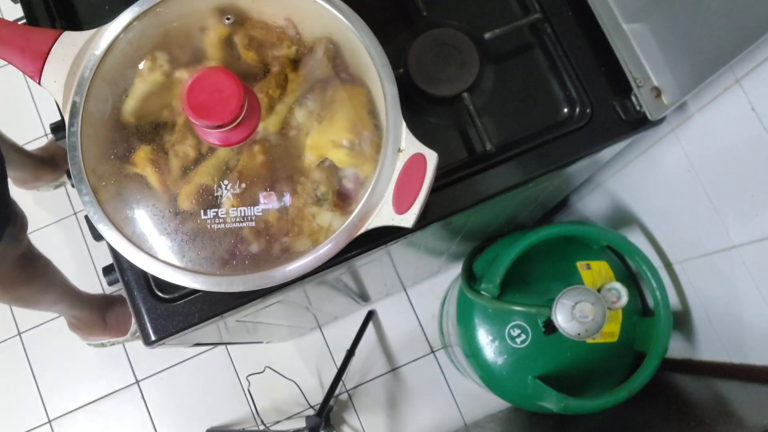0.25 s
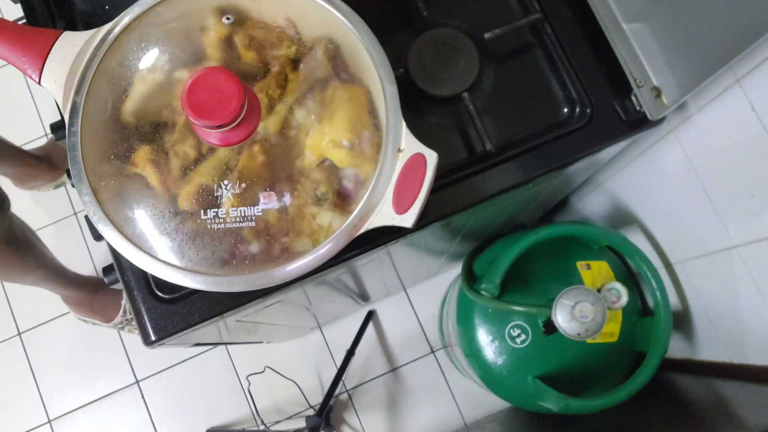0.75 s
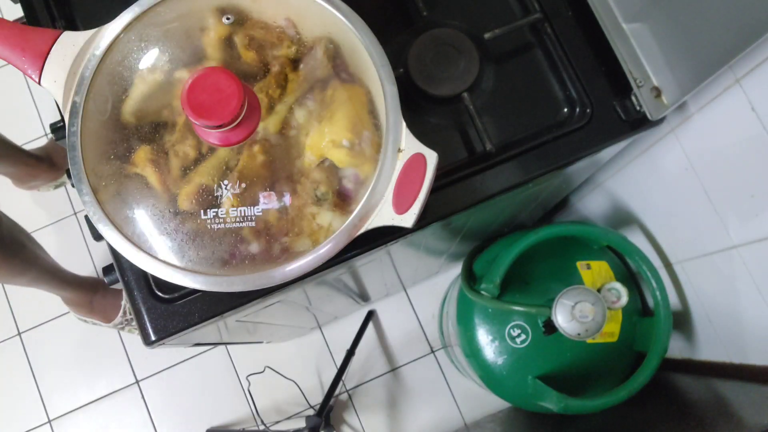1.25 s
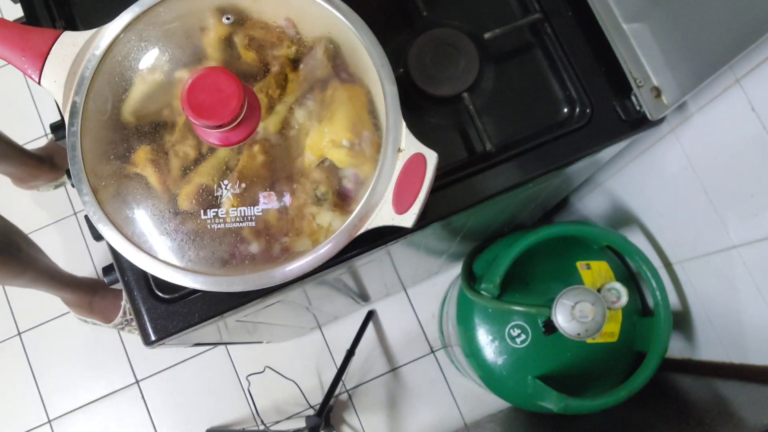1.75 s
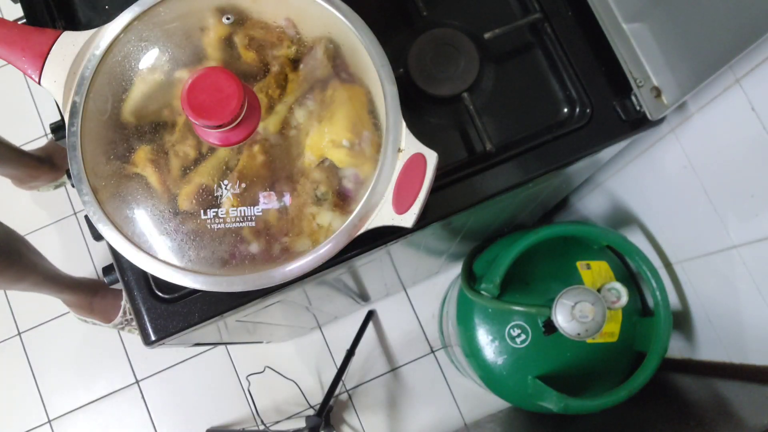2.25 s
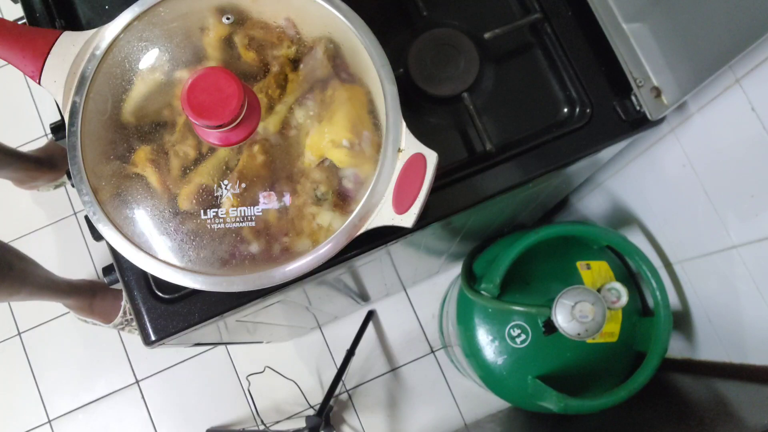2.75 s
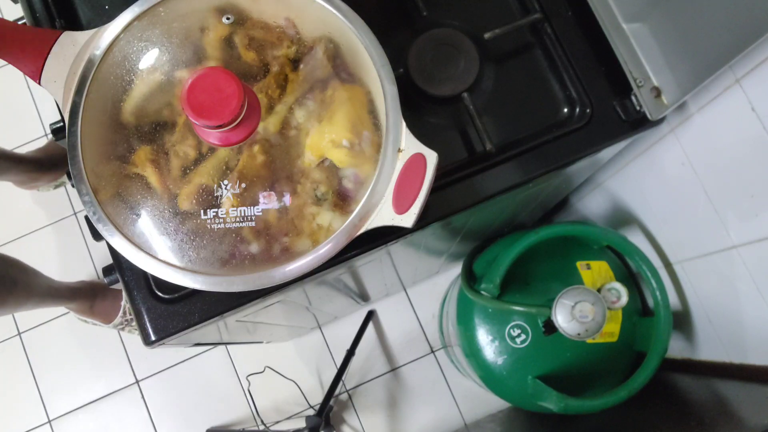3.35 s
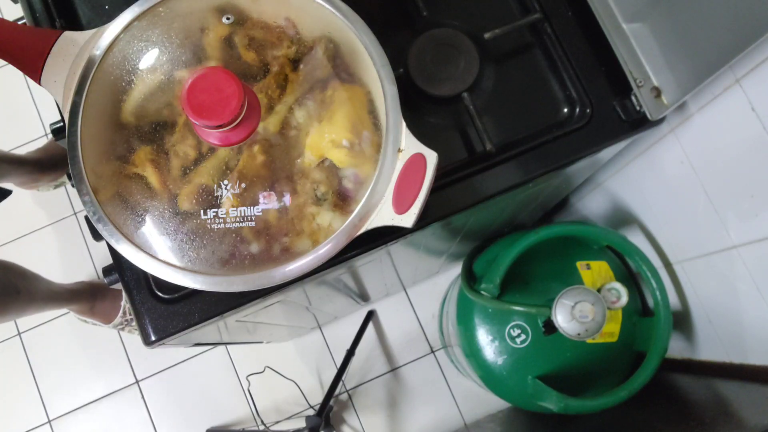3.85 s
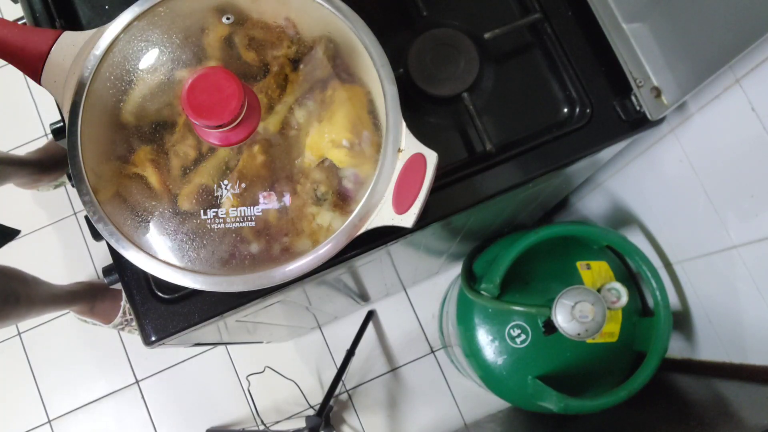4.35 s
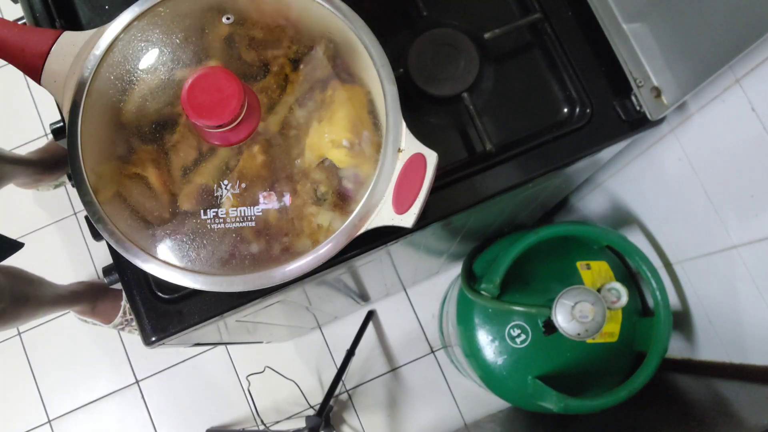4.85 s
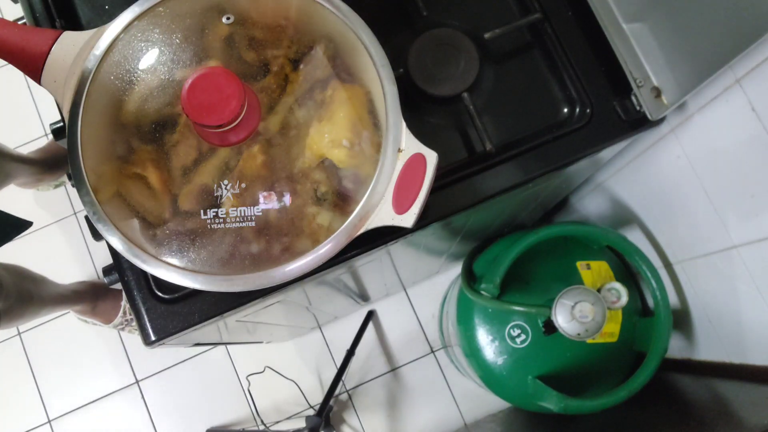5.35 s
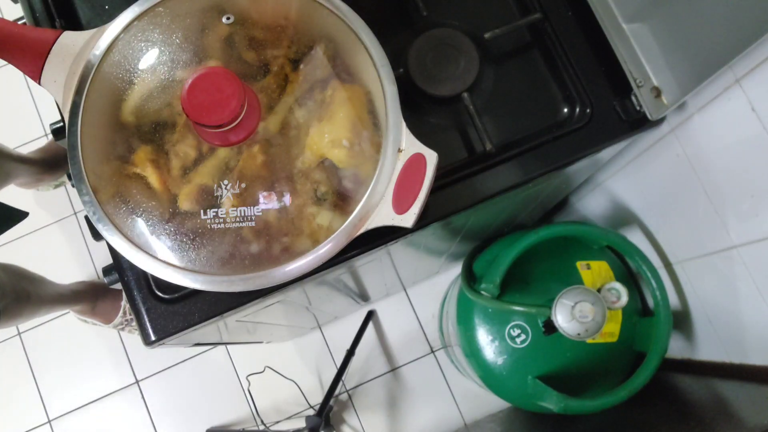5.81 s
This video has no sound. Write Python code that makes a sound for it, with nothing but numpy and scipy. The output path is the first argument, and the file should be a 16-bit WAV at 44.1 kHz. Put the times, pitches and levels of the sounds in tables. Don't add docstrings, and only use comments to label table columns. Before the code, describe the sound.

Close, gentle sizzling and bubbling in a covered pan over faint low machine hum, with one short clunk and rattle of the stove early on.

```python
import sys
import numpy as np
from scipy import signal
from scipy.fft import rfft, irfft, next_fast_len
from scipy.io import wavfile
from scipy.ndimage import uniform_filter1d, map_coordinates

SR = 44100
rng = np.random.default_rng(int(sys.argv[2]) if len(sys.argv) > 2 else 0)


def how_loud(loudness_db):
    steps = np.asarray(loudness_db, float) / 20
    return 10 ** steps


def master(y):
    cut = np.clip(np.atleast_2d(y).T, -1, 1)
    pcm = np.round(cut * 32767)
    wavfile.write(sys.argv[1], SR, pcm.astype(np.int16))


N = 267995


def unit(x):
    return x / np.sqrt(np.mean(x ** 2) + 1e-20)


def along(points, hz):
    f, v = np.transpose(points)
    return np.interp(np.log(hz + 1), np.log(f + 1), v)


def wobble(rate):
    return map_coordinates(rng.standard_normal(N // 100), [np.arange(N) * rate / SR])


def filtered(x, response):
    m = next_fast_len(N + SR // 2)
    return irfft(rfft(x, m) * response(np.fft.rfftfreq(m, 1 / SR)), m)[..., :N]


def coloured(x, colour):
    return filtered(x, lambda hz: how_loud(along(colour, hz)))


def peak(hz, centre_hz, width_hz):
    return 1j * hz * width_hz / (centre_hz ** 2 - hz ** 2 + 1j * hz * width_hz)


def resonant(x, modes):
    def response(hz):
        return sum((-1) ** k * how_loud(db) * peak(hz, f, width) for k, (f, width, db) in enumerate(modes))
    return filtered(x, response)


# f/Hz [Hz], correlation [0-1]
SIDE_LIKENESS = [(60, .988), (200, .94), (330, .74), (1000, .7), (1350, .5), (2500, .48), (3500, .45),
                 (4300, .7), (5000, .5), (7500, .4), (10000, .2), (15000, .1)]
# f/Hz [Hz], lead of the right side [rad]
RIGHT_LEAD = [(700, 0), (1150, -.7), (1600, 2), (1900, .3), (2600, .4), (2900, -1.8), (3330, .8),
              (3560, 2.6), (3950, -1.4), (4700, 3.1), (5300, 4.9), (6000, 9), (7500, 13.6), (9000, 18)]


def spread(pair):
    def weights(hz):
        turn = np.arccos(np.clip(along(SIDE_LIKENESS, hz), -1, 1)) / 2
        return np.array([np.cos(turn), np.sin(turn)])
    mid, side = filtered(pair, weights)
    right = filtered(mid - side, lambda hz: np.exp(1j * along(RIGHT_LEAD, hz)))
    return np.array([mid + side, right])


# f/Hz [Hz], relative t60/s [s]
TILE_DECAY = [(200, 1), (2000, 0.35), (8000, 0.95), (15000, 0.065)]


def echo(x, t60_scale):
    hz, t, z = signal.stft(rng.standard_normal((2, SR // 2)), SR, nperseg=256)
    t60 = t60_scale * along(TILE_DECAY, hz)[:, None]
    tail = signal.istft(z * how_loud(-60 * t / t60), SR, nperseg=256)[1]
    return signal.fftconvolve(np.atleast_2d(x), tail / np.linalg.norm(tail[0]), axes=1)[:, :N]


# f/Hz [Hz], width/Hz [Hz], level/dB [dB]
ROOM_MODES = [(30.3, 3.2, -14), (44.4, 5.7, -9.5), (63, 16.4, -10), (87.5, 8.4, -7.5), (113, 41, -15),
              (151.3, 28.7, -11), (164.4, 26.7, -14), (231, 32, -22), (253.5, 38, -25.5), (356, 89, -29)]
# f/Hz [Hz], level/dB [dB rms]
MOTOR_TONES = [(44, -64.5), (60, -53.5), (86, -64), (145, -74), (253, -78.5), (299, -86), (337, -86.5),
               (392.5, -79.5), (422, -85.5), (480.5, -86.5), (523, -81.5), (555, -85)]


def kitchen():
    t = np.arange(N) / SR
    air = unit(resonant(spread(rng.standard_normal((2, N))), ROOM_MODES))
    rumble = how_loud(-56 + 0.4 * wobble(3.01)) * air
    tones = np.zeros(N)
    for hz, db in MOTOR_TONES:
        level = np.sqrt(2) * how_loud(db + 1.3 * wobble(4.4))
        tones += level * np.sin(2 * np.pi * hz * t + 0.95 * wobble(3.79))
    return (rumble + tones) * how_loud([[0.4], [-0.4]])


# f/Hz [Hz], level/dB [dB], t60/s after release [s]
PANEL_MODES = [(63.3, -48, .3), (108, -56, .8), (145, -56, 4), (184.8, -45, .12), (226.9, -38.5, .11)]
# f/Hz [Hz], level/dB [dB per Hz]
LOOSE_COLOUR = [(60, -120), (110, -7), (170, -3), (320, 0), (600, -8), (900, -15), (1500, -120)]


def panel():
    shake_s, rise_s, in_step_s, let_go_s = 1.512, 0.016, 1.5535, 1.601
    t = np.arange(N) / SR
    rise = (1 - np.exp(-np.maximum(t - shake_s, 0) / rise_s)) ** 2
    free = np.maximum(t - let_go_s, 0)
    modes = np.zeros(N)
    for hz, db, t60 in PANEL_MODES:
        level = how_loud(db + 0.62 * wobble(14.1) - 60 * free / t60)
        modes += level * np.cos(2 * np.pi * hz * (t - in_step_s))
    loose = unit(coloured(spread(rng.standard_normal((2, N))), LOOSE_COLOUR))
    return rise * (modes + how_loud(-54 - 60 * free / 0.9) * loose)


def ring(modes, t, start_s, attack_s):
    tones = np.zeros(len(t))
    for (hz, db, t60), chance_db in zip(modes, rng.standard_normal(len(modes))):
        tones += how_loud(db + chance_db - 60 * t / t60) * np.sin(2 * np.pi * hz * (t + start_s))
    return tones * (1 - np.exp(-t / attack_s))


# f/Hz [Hz], level/dB [dB], t60/s [s]
STOVE_MODES = [(64, -15, .3), (103.8, -10, 0.24), (150, -11, 0.5), (185.4, -1.5, .12), (228.3, 11.5, .11),
               (296, 0, 0.13), (405, -18, .12), (470, -19, 0.092), (549, -17, 0.13)]
# t/s [s], thud level/dB [dB], boom level/dB [dB], hollow note f/Hz [Hz], its level/dB [dB]
BLOWS = [(1.3155, -57, -66, 935, -36.5), (1.331, -63, -62, 293, -43), (1.355, -66, -67, 515, -41),
         (1.412, -68, -73, 870, -47), (1.519, -56, -58, 410, -48), (1.530, -60, -62, 296, -43),
         (1.543, -56, -60, 1120, -44), (1.581, -57, -60, 1170, -43), (1.592, -62, -60, 547, -46),
         (1.694, -55, -57, 1030, -50), (1.711, -56, -56, 334, -52), (1.64, -60, -64, 403, -49)]


def stove_body():
    body, t = np.zeros(N), np.arange(SR // 2) / SR
    for s, thud_db, boom_db, note_hz, note_db in BLOWS:
        note = how_loud(note_db - 60 * t / 0.055) * np.sin(2 * np.pi * note_hz * t) * (1 - np.exp(-t / 0.003))
        dull = signal.lfilter([0.0064], [1, -2 * 0.92, 0.92 ** 2], rng.standard_normal(len(t)))
        thud = how_loud(thud_db + 23 - 60 * t / 0.11) * dull
        boom = how_loud(boom_db) * ring(STOVE_MODES, t, s, attack_s=0.0012)
        body[round(s * SR):][:len(t)] += boom + thud + note
    return body


# t/s [s], level/dB [dB], share on the second bar [0-1]
CONTACTS = [(1.536, -39, 0), (1.5395, -35, 0), (1.5428, -25, 0), (1.5455, -28, .1), (1.549, -30, .2),
            (1.554, -34, .4), (1.558, -35, .5), (1.562, -34, .5), (1.566, -35, .5), (1.570, -36, .6),
            (1.5747, -27, .7), (1.5775, -26, .8), (1.5805, -26, .8), (1.5845, -29, .9), (1.589, -34, .9),
            (1.594, -33, .9), (1.599, -43, 1), (1.606, -46, 1), (1.614, -48, 1), (1.625, -46, 1),
            (1.636, -46, .5)]
# f/Hz [Hz], width/Hz [Hz], level/dB [dB]
FIRST_BAR = [(1110, 160, -3), (1960, 170, -1.5), (2140, 40, -7), (2450, 110, -7), (3400, 790, -3.5),
             (4200, 220, 1.5), (4714, 120, 13), (5120, 450, -20), (6270, 670, 2.5), (6940, 200, -6),
             (7420, 120, 12), (9200, 440, 2), (10700, 2900, -3.5)]
# f/Hz [Hz], width/Hz [Hz], level/dB [dB]
SECOND_BAR = [(1160, 220, -14), (2070, 83, -16), (2620, 24, 12), (2800, 300, 0.5), (3520, 82, 3),
              (3900, 500, -1.5), (4660, 400, -3), (5080, 20, 14), (5300, 400, -19), (5930, 300, 6.5),
              (7060, 100, 4), (7500, 140, 7), (8930, 1300, -3), (12600, 5000, -4)]


def grate():
    scrape_t60, click_t60, touch_s = 0.018, 0.003, 0.0004
    chatter, t = np.zeros((2, N)), np.arange(SR // 2) / SR
    contact = (1 - np.exp(-t / touch_s)) * (how_loud(-60 * t / scrape_t60) + how_loud(-60 * t / click_t60))
    for s, db, share in CONTACTS:
        hit = how_loud(db + 9) * contact * rng.standard_normal(len(t))
        chatter[:, round(s * SR):][:, :len(t)] += np.sqrt([[1 - share], [share]]) * hit
    bars = resonant(chatter[0], FIRST_BAR) + resonant(chatter[1], SECOND_BAR)
    return filtered(bars, lambda hz: peak(hz + 1, 900, 15000))


def knock():
    out = stove_body() + grate()
    answer = echo(out, t60_scale=0.34)
    return how_loud(-1.4) * spread(np.array([out, 0 * out])) + how_loud(-8) * spread(answer)


# t/s [s], f/Hz [Hz], left and right level/dB [dB], t60/s [s]
PARTIALS = [(1.5395, 2090, -35, -38, .06), (1.5428, 2164, -33, -35, .07), (1.5428, 4188, -31, -35, .07),
            (1.5428, 7472, -29, -26, .035), (1.5428, 6060, -33, -37, .06), (1.5428, 6971, -37, -36, .04),
            (1.5428, 5480, -39, -33, .06), (1.5428, 4716, -38, -40, .07), (1.5455, 5100, -41, -35, .06),
            (1.5428, 10900, -36, -38, .05), (1.555, 7480, -41, -41, .035), (1.5625, 7480, -40, -40, .03),
            (1.568, 554, -47, -47, .2), (1.5748, 7480, -37, -33, .04), (1.5748, 2640, -39, -43, .09),
            (1.5748, 2100, -38, -41, .08), (1.5748, 3535, -43, -39, .14), (1.5772, 7504, -35, -30, .045),
            (1.5772, 6060, -28, -32, .05), (1.5772, 6980, -41, -35, .1), (1.5772, 5100, -38, -29, .07),
            (1.5805, 5480, -33, -30, .06), (1.5805, 4188, -35, -38, .07), (1.5845, 3535, -41, -42, .12),
            (1.592, 5097, -41, -45, .15), (1.61, 5097, -45, -43, .12), (1.624, 5097, -44, -48, .06)]


def pings():
    out, t = np.zeros((2, N)), np.arange(SR // 4) / SR
    turns = rng.random((len(PARTIALS), 2, 1))
    for (s, hz, left_db, right_db, t60), turn in zip(PARTIALS, turns):
        fade = how_loud(-60 * t / t60) * (1 - np.exp(-t / 0.0006))
        tone = np.sin(2 * np.pi * (hz * t + 0.25 * turn))
        out[:, round(s * SR):][:, :len(t)] += how_loud([[left_db], [right_db]]) * fade * tone
    return out + how_loud(-16) * echo(out, t60_scale=0.25)


# start t/s [s], length/s [s], centre f/Hz [Hz]
BAND_DIPS = [(.04, .06, 2180), (.16, .06, 3520), (.33, .08, 2850), (.62, .31, 2170), (.9, .05, 3600),
             (1.02, .13, 2170), (1.05, .06, 3520), (1.16, .04, 3750), (1.27, .05, 2200), (1.33, .15, 3530),
             (1.4, .08, 2280), (1.56, .08, 8200), (1.74, .04, 8200), (1.95, .13, 3530), (2.17, .08, 3500),
             (2.28, .1, 3500), (2.6, .05, 2170), (2.7, .08, 2780), (2.74, .18, 3520), (2.8, .05, 2450),
             (3.05, .14, 2300), (3.15, .15, 3540), (3.33, .1, 2170), (3.52, .06, 2170), (3.7, .09, 2800),
             (3.72, .06, 2230), (3.75, .08, 3500), (4.02, .14, 2140), (4.16, .05, 3750), (4.37, .1, 2820),
             (4.6, .15, 2400), (4.62, .06, 2850), (5.08, .12, 2450), (5.38, .1, 2860), (5.44, .07, 3540),
             (5.8, .06, 3490), (5.8, .13, 2230), (5.95, .08, 2800), (6.02, .05, 3540)]


def muted(x):
    depth_db, half_width_hz = -24, 55
    hz, t, z = signal.stft(x, SR, nperseg=1024)
    loss = 0
    for s, length, f in BAND_DIPS:
        band = np.exp(-((hz - f) / half_width_hz) ** 4)
        moment = np.exp(-((t - s - length / 2) / (length / 2)) ** 4)
        loss = loss + np.outer(band, moment)
    return signal.istft(z * how_loud(depth_db * loss), SR, nperseg=1024)[1][:, :N]


# f/Hz [Hz], width/Hz [Hz], left and right level/dB [dB]
PAN_MODES = [(390, 13, 12.5, 10), (846, 480, -1.5, 7.5), (1038, 17, 7.5, -21), (1431.7, 18, 11.5, -4),
             (1494, 36, 8, 6.5), (1682, 50, 9, 7.5), (1985, 42, 6.5, 11), (2600, 18.4, 13, 4),
             (3265, 450, 2.5, 13), (3880, 15, -17, 11), (4130, 120, 7, 7.5), (4753, 374, 16.5, 16),
             (5270, 157, 5, 11), (5810, 290, -1, -3), (6384, 338, 9, 17), (7340, 286, -6, 9.5),
             (9100, 250, -8, -30), (12100, 1000, -37, -6)]
# f/Hz [Hz], left minus right level/dB [dB]
SIDE_BALANCE = [(60, 1.0), (130, 1.0), (290, -9.5), (640, 3.5), (1410, 6.5), (3100, 3), (6820, 7),
                (15000, 3)]


def lid(x):
    def response(hz):
        lift = [np.prod([1 + how_loud(row[side]) * peak(hz, row[0], row[1]) for row in PAN_MODES], axis=0)
                for side in (2, 3)]
        tilt_db = along(SIDE_BALANCE, hz) / 2
        return lift * how_loud([tilt_db, -tilt_db])
    return filtered(x, response)


# f/Hz [Hz], width/Hz [Hz], level/dB [dB]
RIM_GAP = [(2996, 150, 8), (4140, 480, -2), (4970, 140, 2)]


def ajar(x):
    seat_s, takes_s = 0.75, 0.53
    open_share = 1 / (1 + np.exp((np.arange(N) / SR - seat_s) / takes_s))
    singing = filtered(x, lambda hz: sum(how_loud(db) * peak(hz, f, width) for f, width, db in RIM_GAP))
    return x + open_share * singing


# t/s [s], lift level/dB [dB], burst size [-1 coarse to 1 fine]
STEAM_POCKETS = [(.22, 1.5, 1), (.39, -1, .2), (.64, 4.5, 0.56), (.8, 2.5, 0.93), (1.05, 4, 0.94),
                 (1.07, 5.5, -1.65), (1.15, 0.5, 0.9), (1.25, 1, 0.18), (1.68, 3, -1.2), (1.78, -1, 0.077),
                 (2.07, 2.5, -1.5), (2.31, 3, 1), (2.58, 6.5, -0.58), (2.75, 1, 0.85), (2.95, 2, 0.94),
                 (3.16, 2, 0.35), (3.28, 5.5, 0.19), (3.62, -2.5, 0.45), (3.87, 6, 0.42),
                 (3.97, 4.5, -0.72), (4.16, 6.5, 0.015), (4.45, 1, -1.5), (4.57, 4, .5), (4.71, 1.5, 0.8),
                 (4.9, 1, -0.078), (5.25, 6, 0.56), (5.33, 4.5, -0.75), (5.56, 4.5, 0.4), (5.67, 1.5, 0.54),
                 (5.99, 3.5, -1.3)]


def surge(size):
    rise_s, fall_s, reach = 0.019, 0.027, 0.75
    s, lift_db, at = np.transpose(STEAM_POCKETS)
    t = np.arange(0, N / SR + 0.01, 0.002)
    late = t - s[:, None]
    shape = np.exp(-(late / np.where(late < 0, rise_s, fall_s)) ** 2)
    lift = lift_db * np.exp(-((at - size) / reach) ** 2) @ shape
    return np.interp(np.arange(N) / SR, t, lift) + 0.5 * wobble(18)


def patchy(x, depth_db):
    z = signal.stft(x, nperseg=512)[2]
    field = uniform_filter1d(rng.standard_normal(z.shape[1:]), size=4, axis=0)
    field = uniform_filter1d(field, size=9, axis=1)
    return signal.istft(z * how_loud(depth_db * unit(field)), nperseg=512)[1][:, :N]


def bursts(colour, spike_db, clump_db, burst_s, depth_db):
    sizes = how_loud(spike_db * np.minimum(rng.exponential(size=N), 4.5))
    start = (rng.random(N) < 1500 / SR) * sizes
    gate = signal.lfilter([1], [1, -np.exp(-1 / (burst_s * SR))], start)
    gate = np.sqrt(unit(gate) + 0.81) * how_loud(clump_db * (0.67 * wobble(12) + wobble(35)))
    pair = patchy(spread(gate * rng.standard_normal((2, N))), depth_db)
    return unit(coloured(pair, colour))


def strays(count, db, hz):
    at, size, pitch = rng.random((count, 3)).T
    return list(zip(at * N / SR, db + 6 * (size - 0.5), hz * (1 + 0.25 * (pitch - 0.5))))


def spits(drops, width_hz, t60, rise_s, pan_db, scatter_db):
    out, t = np.zeros((2, N + SR)), np.arange(1024) / SR
    puff = how_loud(-60 * t / t60) * (1 - np.exp(-t / rise_s))
    bins_hz = np.fft.rfftfreq(len(t), 1 / SR)
    for s, db, hz in drops:
        noise = rng.standard_normal(len(t))
        pop = irfft(rfft(noise * puff) * peak(bins_hz, hz, width_hz))
        side_db = pan_db + scatter_db * noise[0]
        gain = how_loud(db - 5.5 + np.array([[side_db], [-side_db]]) / 2)
        out[:, round(s * SR):][:, :len(t)] += gain * pop / abs(pop).max()
    out = out[:, :N]
    return out + echo(out, t60_scale=0.041)


# t/s [s], level/dB [dB]
BOIL = [(0.0, -45.5), (0.73, -45.5), (1.37, -46.5), (1.57, -45.5), (2.52, -46.5), (3.2, -46), (3.46, -47),
        (4.29, -47.5), (4.63, -45), (5.27, -48.5), (5.75, -47), (6.07, -47)]
# f/Hz [Hz], level/dB [dB per Hz]
FIZZ_COLOUR = [(300, -120), (1500, -21), (2300, -2.5), (3000, -2.5), (4500, -5.5), (6000, -3), (7500, -7.5),
               (8300, -2), (11000, -36), (16500, 5)]
# f/Hz [Hz], level/dB [dB per Hz]
HISS_COLOUR = [(3000, -120), (6000, -20), (8500, -5), (10000, -2.5), (12000, -1), (13200, 0), (13900, -2),
               (14550, 1), (15200, -3), (15800, -3)]
# f/Hz [Hz], level/dB [dB per Hz]
SIMMER_COLOUR = [(150, -120), (300, -8), (480, -6.5), (800, 0.5), (1200, 2), (1800, -2), (2250, -13.5),
                 (2700, -7), (3300, -11), (5000, -84)]
# t/s [s], peak level/dB [dB], f/Hz [Hz]
DROPS_LARGE = [(0.0468, -35, 4960), (0.1077, -35, 5100), (0.1535, -35, 4890), (0.1835, -37, 5230),
               (0.2773, -37, 5070), (0.2892, -36, 5080), (0.3252, -37, 5000), (0.396, -37, 4140),
               (0.5357, -36, 4220), (0.6384, -36, 4060), (0.6584, -39, 5260), (0.7791, -35, 5010),
               (0.7996, -38, 5420), (0.8729, -38, 5300), (0.8879, -37, 4350), (0.9173, -39, 5120),
               (0.9338, -38, 5180), (1.049, -37, 4230), (1.1004, -38, 4240), (1.1697, -36, 5330),
               (1.2296, -38, 5280), (1.2526, -35, 6640), (1.4187, -38, 5280),
               (1.7711, -40, 4890), (1.8878, -36, 4160), (1.9921, -39, 4160), (2.0275, -39, 5270),
                (2.1103, -39, 4810), (2.1273, -38, 5130), (2.1522, -39, 5310), (2.238, -40, 5250),
                (2.252, -39, 4130), (2.3049, -38, 5440), (2.4141, -40, 5320), (2.4585, -40, 4800),
                (2.5354, -33, 4130), (2.5578, -37, 5280), (2.6361, -37, 4150), (2.6616, -39, 5720),
                (2.8307, -39, 4260), (2.9439, -38, 5280), (3.0257, -38, 5240), (3.122, -37, 5430),
                (3.1609, -37, 5290), (3.1794, -36, 5250), (3.2228, -37, 5290), (3.2542, -37, 5270),
                (3.2847, -35, 4150), (3.3171, -37, 5260), (3.3839, -42, 5750), (3.4054, -39, 5470),
                (3.4323, -40, 3280), (3.5266, -39, 5170), (3.6159, -42, 5720), (3.6718, -41, 5050),
                (3.7192, -42, 5170), (3.8045, -38, 4090),
               (2.5694, -38, 6220), (2.578, -37, 4200), (2.586, -40, 4280), (2.6014, -41, 5310),
               (2.6134, -41, 5180), (2.6804, -45, 7240), (2.7204, -41, 4140), (3.1274, -36, 5760),
               (3.1364, -38, 5270), (3.2704, -37, 5200), (3.2944, -38, 5230), (3.3554, -35, 5130),
               (3.8043, -38, 4090), (3.8587, -36, 6340), (3.8802, -35, 5170), (3.9306, -39, 5220),
              (3.9989, -39, 4090), (4.0927, -40, 4820), (4.1545, -37, 5320), (4.193, -39, 7420),
              (4.3187, -38, 5780), (4.3586, -40, 5170), (4.389, -39, 5450), (4.4444, -37, 5410),
              (4.4848, -39, 3380), (4.5267, -38, 4100), (4.5656, -37, 5800), (4.617, -40, 5350),
              (4.6399, -38, 5080), (4.7028, -37, 5310), (4.7741, -41, 6190), (4.8659, -43, 5710),
              (4.8839, -38, 5220), (4.9238, -40, 5190), (4.9542, -40, 5140), (5.2421, -38, 6220),
              (5.3478, -41, 4070), (5.4137, -40, 5210), (5.479, -37, 4230), (5.503, -39, 5230),
              (5.5399, -36, 4260), (5.5579, -37, 7150), (5.5978, -37, 4660), (5.6621, -38, 6320),
              (5.733, -40, 5270), (5.7694, -40, 4100), (5.9375, -39, 4160), (5.9589, -40, 5180)]
# t/s [s], peak level/dB [dB], f/Hz [Hz]
DROPS_FINE = [(.162, -37, 12600), (1.043, -32, 12800), (1.1438, -34, 11700), (1.631, -36, 14600),
              (1.9466, -37, 9400), (2.0823, -37, 13000), (2.2514, -35, 13000), (2.3103, -33, 12100),
              (2.3542, -35, 13000), (3.0286, -39, 11600), (3.1354, -36, 11200), (3.2811, -36, 11700),
              (3.7011, -36, 11900), (3.9635, -37, 13300), (4.3167, -37, 14700), (4.4888, -37, 14600),
              (4.6769, -35, 14200), (5.8452, -37, 12500), (6.0034, -36, 13100)]


def frying():
    s, db = np.transpose(BOIL)
    boil_db = np.interp(np.arange(N) / SR, s, db)
    mean_db = boil_db.mean()
    swing_db = boil_db - mean_db
    fizz = unit(lid(bursts(FIZZ_COLOUR, spike_db=5.5, clump_db=-1.0, burst_s=0.00035, depth_db=1.4)))
    fizz = fizz * how_loud(boil_db - 1.56 + surge(size=0))
    hiss = unit(lid(bursts(HISS_COLOUR, spike_db=0.0, clump_db=0.8, burst_s=0.0016, depth_db=1.5)))
    hiss = hiss * how_loud(mean_db + 0.65 * swing_db - 0.85 + surge(size=1))
    simmer = unit(lid(bursts(SIMMER_COLOUR, spike_db=6.0, clump_db=1.0, burst_s=0.0069, depth_db=1.6)))
    simmer = simmer * how_loud(mean_db + 0.89 * swing_db - 8 + surge(size=-1))
    large = spits(DROPS_LARGE,
                  width_hz=650, t60=0.011, rise_s=0.0008, pan_db=-3.0, scatter_db=4)
    fine = spits(DROPS_FINE + strays(count=20, db=-43, hz=13200),
                 width_hz=2700, t60=0.012, rise_s=0.0008, pan_db=2.1, scatter_db=0.8)
    return ajar(fizz) + hiss + simmer + large + fine


def scene():
    return muted(frying() + knock() + pings()) + panel() + kitchen()


def top_cut(x):
    return signal.sosfilt(signal.butter(12, 15830, fs=SR, output="sos"), x)


def record(dry):
    mix = filtered(dry, lambda hz: (hz < 15830) / (1 + (31.8 / (hz + 1)) ** 6))
    return top_cut(mix)


dry = scene()
out = record(dry)
master(out)
```